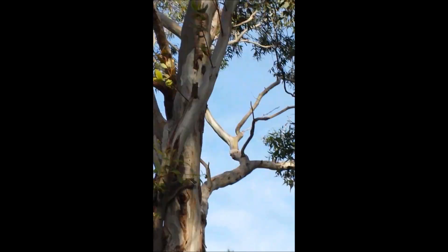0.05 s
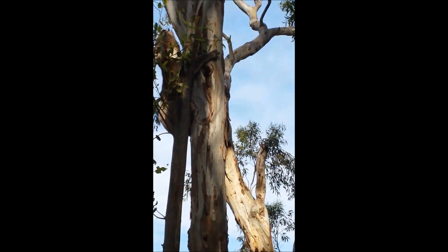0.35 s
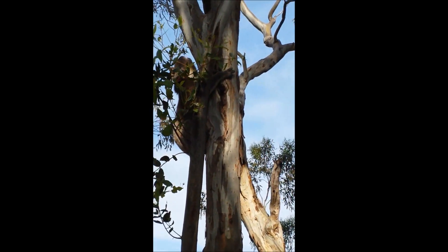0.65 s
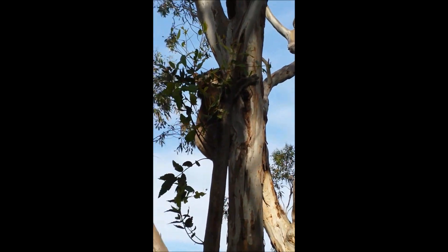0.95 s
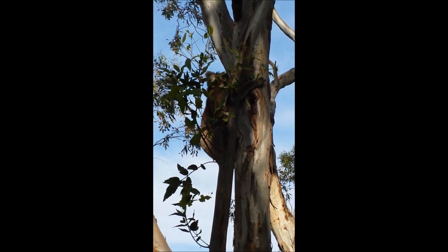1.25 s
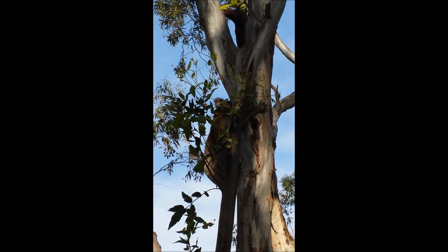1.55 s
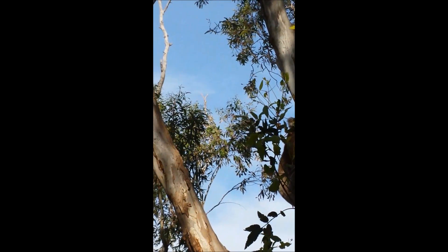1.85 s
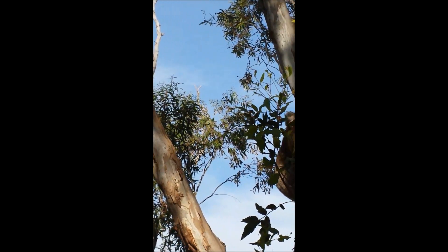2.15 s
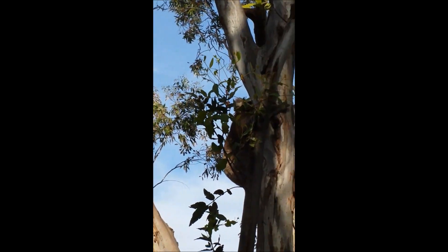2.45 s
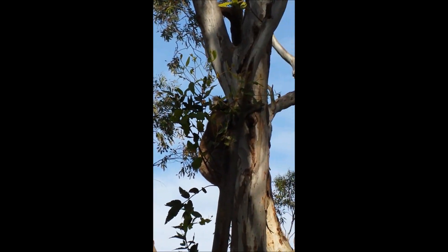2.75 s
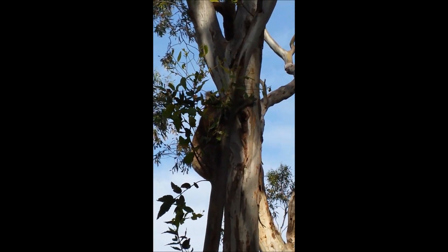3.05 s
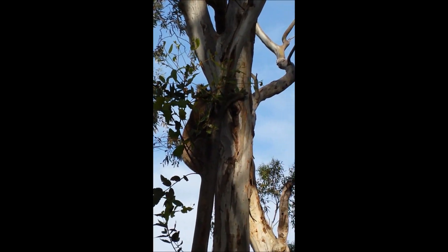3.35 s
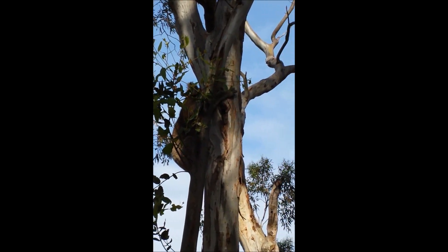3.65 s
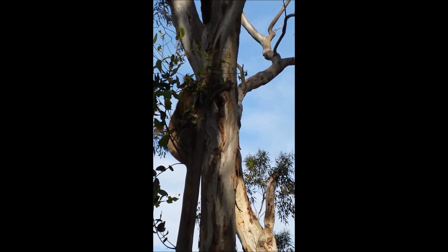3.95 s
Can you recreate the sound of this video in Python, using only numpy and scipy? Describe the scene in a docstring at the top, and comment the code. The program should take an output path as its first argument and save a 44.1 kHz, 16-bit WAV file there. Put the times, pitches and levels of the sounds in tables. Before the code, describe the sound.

A koala bellows outdoors: a rattling grunt, two soft low drones, the first hoarse, then slow pulses dying away. A twig cracks close on the right, and a far bird whistles faintly while air rumbles on the microphone.

```python
"""Koala bellowing in a gum tree

A rattling grunt, two soft low drones, then slow pulses that die away: vocal folds ringing a throat.
A hoarse rasp rides on the first drone; a twig-like crack and small ticks sound close on the right.
Behind them a far bird whistles, air rumbles and bumps at the microphone, and a hiss swells and sinks."""
import sys
import numpy as np
from scipy import signal
from scipy.fft import rfft, irfft
from scipy.io import wavfile
from scipy.ndimage import uniform_filter1d

SR = 44100
rng = np.random.default_rng(int(sys.argv[2]) if len(sys.argv) > 2 else 0)


def master_out(mix):
    """Clip the mix to full scale and print it as 16-bit PCM to the path in sys.argv[1]."""
    frames = np.transpose(np.atleast_2d(mix))
    ceiling = np.clip(frames, -1, 1)
    pcm = np.round(ceiling * 32767).astype(np.int16)
    wavfile.write(sys.argv[1], SR, pcm)


N = 176400
T = np.arange(N) / SR
HZ = np.fft.rfftfreq(N, 1 / SR)

# How each layer swells and fades: time_s, level_db
HISS_FADER = [(0, -64), (0.22, -64.5), (0.29, -69.5), (0.42, -70), (0.58, -65), (0.8, -65), (0.87, -69),
              (1.22, -69), (1.4, -66), (1.7, -64), (1.95, -69.5), (2.62, -67), (2.95, -72.5), (3.45, -74),
              (3.65, -69.5), (3.85, -72), (4, -73)]
RUMBLE_FADER = [(0, -56), (1.3, -54.5), (2.0, -53.5), (2.7, -55), (3.05, -60.5), (4, -61)]
BUFFET_FADER = [(3.46, -69), (3.52, -49), (3.61, -48.5), (3.75, -50), (3.80, -63)]
RUSTLE_FADER = [(2.52, -80), (2.545, -49.5), (2.57, -50.5), (2.59, -56), (2.72, -69)]
RASP_FADER = [(0.49, -64.5), (0.525, -51.5), (0.57, -57), (0.605, -49), (0.73, -53), (0.80, -59),
              (0.825, -74)]
FIRST_DRONE_FADER = [(0.35, -66), (0.39, -49), (0.46, -41), (0.485, -45.5), (0.77, -42), (0.85, -66.5)]
SECOND_DRONE_FADER = [(1.0, -58.5), (1.15, -48), (1.25, -50), (1.40, -46), (1.45, -40.5), (1.49, -46),
                      (1.52, -44), (1.645, -38.5), (1.675, -46), (1.725, -42.5)]
# EQ curves that colour the noise layers: frequency_hz, relative_gain_db
HISS_EQ = [(450, 7), (2000, 1.63), (8000, 0), (14500, -2)]
RUMBLE_EQ = [(12, -23), (30, -13), (55, 1.5), (90, -0.5), (150, -6), (250, -18.5), (500, -31.5),
             (15000, -62)]
BUFFET_EQ = [(25, -14), (100, 6), (170, -7.5), (350, -26), (15000, -62)]
CRACK_EQ = [(200, -3), (900, 1), (1500, -8), (2900, -2.5), (3700, 2.5), (4500, -2.5), (5400, -1),
            (6500, -6.5), (10000, -8.5), (12000, -23)]
TICK_EQ = [(2000, -24), (4500, 10.5), (7500, 9), (11000, -16)]
# Stereo placement across the spectrum: frequency_hz, left_minus_right_db
HISS_PAN = [(3000, -4), (14000, -1.5)]
GRUNT_PAN = [(100, -1), (200, 2), (400, -3), (700, -5), (1300, -9.5), (4000, -8)]
BELLOW_PAN = [(100, -6), (200, -5.5), (400, -13), (700, -15), (1300, -24), (4000, -27)]
# Bumps of air at the microphone: start_s, pitch_hz, gain_db, left_minus_right_db
AIR_BUMPS = [(1.308, 102, -33, 12), (3.676, 109, -18.5, -32)]
# Bird whistles: start_s, length_s, start_pitch_hz, end_pitch_hz, level_db
BIRD_NOTES = [(2.90, 0.12, 2950, 2900, -71), (3.128, 0.075, 2760, 2780, -72),
              (3.162, 0.15, 3020, 2930, -66.5), (3.286, 0.13, 2955, 2940, -70.5),
              (3.428, 0.28, 2960, 2890, -63.5)]
# Thin ticks: start_s
TICK_STARTS = [.036, .356, .677, 1.318, 1.337, 1.639, 1.958, 2.279, 2.918, 2.990, 3.238, 3.558]
# Snaps that make up the crack: start_s, level_db, t60_s
CRACK_SNAPS = [(2.5432, -39, 0.0065), (2.552, -35.5, 0.0052), (2.5641, -29, 0.012), (2.608, -41, 0.011)]
# Resonances of the rasp: centre_hz, width_hz, relative_gain_db
RASP_RESONANCES = [(256, 28, 2), (1080, 1230, -16.5), (1575, 96, 5), (2437, 340, -12.5), (3010, 130, -16),
                   (3403, 150, -7.5), (5040, 270, -17.5), (5540, 180, -16)]
# Sharp catches in the rasp: start_s, added_gain_db
RASP_ACCENTS = [(0.580, 9.5), (0.645, 8.5), (0.683, 5), (0.712, 7.5)]
# Throat resonances for each part of the call: pitch_hz, gain_db, t60_s
DRONE_THROAT = [(183.7, 9, 0.049), (310, -23, 0.2), (647, -32, 0.045), (1120, -21.5, 0.02),
                (1846, -31, 0.1)]
PULSE_THROAT = [(187.6, 1.5, 0.093), (329.7, -9.5, 0.092), (628, -13.5, 0.046), (1096, -20, 0.032),
                (1440, -30, 0.032), (1720, -22.5, 0.022), (3280, -34.5, 0.017)]
GRUNT_THROAT = [(150.4, -0.5, 0.041), (192.5, 3.5, 0.059), (327, -9.5, 0.046), (572, -11, 0.073),
                (1105, -17, 0.025), (1283, -22.5, 0.04), (1700, -21.5, 0.032)]
# Slow throat pulses: start_s, gain_db, tilt_db_per_octave
PULSE_CUES = [(1.750, -31.5, 3), (1.835, -30, 1.5), (1.910, -30.5, 0), (1.989, -33, -0.8),
              (2.062, -32, -1.5), (2.135, -31.5, -2.2), (2.208, -30.5, -3.5), (2.285, -32, -2.5),
              (2.350, -32, -5.5), (2.423, -31, -5), (2.496, -31.5, 0.5), (2.563, -32.5, -2),
              (2.599, -33, -13), (2.631, -34, -1.5), (2.702, -37, -3), (2.74, -38.5, -6)]


def amp(db):
    """Decibels to gain."""
    return 10 ** (np.asarray(db) / 20)


def unit(x):
    """Scales to rms 1."""
    return x / np.sqrt(np.mean(abs(x) ** 2) + 1e-20)


def decay(t, t60_s):
    """A fade that falls 60 dB in t60_s."""
    return np.exp(-np.log(1000) * t / t60_s)


def drift(samples):
    """Slow random wobble: noise smoothed over this many samples."""
    return unit(uniform_filter1d(rng.standard_normal(N), size=samples))


def fader(points):
    """Gain over time, closing to silence just outside the first and last points."""
    time_s, db = np.transpose(points)
    inside_s = np.minimum(T - time_s[0], time_s[-1] - T)
    return amp(np.interp(T, time_s, db)) * np.clip(inside_s * 100 + 2, 0, 1)


def spectrum(points):
    """Gain over frequency, drawn on a log axis."""
    hz, db = np.transpose(points)
    return amp(np.interp(np.log(HZ + 1), np.log(hz), db))


def eq(x, curve):
    """Colours a sound, keeping the power of white noise."""
    return irfft(rfft(x) * unit(spectrum(curve)), N)


def pan(x, curve):
    """Shares a sound between left and right, frequency by frequency."""
    ratio = spectrum(curve)
    return irfft(rfft(x) * np.array([ratio, np.ones_like(ratio)]) * 2 / (1 + ratio), N)


def on_right(x, left_db):
    """Places a sound on the right by turning the left down."""
    return x * amp([[left_db], [0]])


def add(mix, start_s, sound):
    """Mixes a sound in at its cue."""
    at = round(start_s * SR)
    sound = sound[max(-at, 0):]
    part = mix[max(at, 0):][:len(sound)]
    part += sound[:len(part)]


def burst(db, t60_s):
    """A short dying puff of noise."""
    t = np.arange(SR // 20) / SR
    return amp(db) * rng.standard_normal(len(t)) * decay(t, t60_s)


def hiss(trim_db=7.5):
    """A wide, faint bed of hiss that swells and sinks."""
    bed = eq(rng.standard_normal((2, N)), HISS_EQ)
    return pan(bed, HISS_PAN) * fader(HISS_FADER) * amp(trim_db)


def air(rumble_db=2, correlation=0.45, bump_rise_s=0.0031):
    """Air on the microphone: a wide rumble, a bump on each side, and buffeting on the right."""
    left, independent, gust = rng.standard_normal((3, N))
    right = amp(-1) * (correlation * left + np.sqrt(1 - correlation ** 2) * independent)
    rumble = eq(np.array([left, right]), RUMBLE_EQ) * fader(RUMBLE_FADER) * amp(rumble_db)
    buffet = on_right(eq(gust, BUFFET_EQ) * fader(BUFFET_FADER), left_db=-20)
    t = np.arange(SR // 10) / SR
    for start_s, hz, db, left_db in AIR_BUMPS:
        envelope = t / bump_rise_s * np.exp(-t / bump_rise_s)
        bump = amp(db) * envelope * np.sin(2 * np.pi * hz * t)
        add(buffet[0], start_s, amp(left_db) * bump)
        add(buffet[1], start_s, bump)
    return rumble + buffet


def bird(waver=0.0035):
    """Thin, far, wavering whistles, most of them sliding down a little."""
    out = np.zeros(N)
    for start_s, length_s, start_hz, end_hz, db in BIRD_NOTES:
        progress = np.linspace(0, 1, int(length_s * SR))
        glide_hz = start_hz + (end_hz - start_hz) * progress
        hz = glide_hz * (1 + waver * drift(200)[:len(progress)])
        tone = np.sin(2 * np.pi * np.cumsum(hz) / SR)
        add(out, start_s, amp(db) * np.sin(np.pi * progress) * tone)
    return on_right(out, left_db=-15)


def ticks(first_db=-41, fade_db_per_s=1.5):
    """Scattered pinpricks of bright noise that grow fainter."""
    out = np.zeros(N)
    for start_s in TICK_STARTS:
        add(out, start_s, burst(first_db - fade_db_per_s * start_s, t60_s=0.003))
    return on_right(eq(out, TICK_EQ), left_db=-19)


def crack():
    """A dry, twig-like crack: quick snaps of noise over a rustle."""
    out = fader(RUSTLE_FADER) * rng.standard_normal(N)
    for start_s, db, t60_s in CRACK_SNAPS:
        add(out, start_s, burst(db, t60_s))
    return on_right(eq(out, CRACK_EQ), left_db=-19)


def rasp(trim_db=5, grains_per_s=300, grit=0.76, catch_decay_s=0.0045):
    """Irregular grains and air pushed through resonances, with a few hard catches."""
    grains = (rng.random(N) < grains_per_s / SR) * rng.uniform(0.5, 1, N)
    breath = unit(grit * unit(grains) + rng.standard_normal((2, N)))
    resonances = sum((-1) ** k * amp(db) / (1 + 1j * (HZ - hz) / width_hz) ** 2
                     for k, (hz, width_hz, db) in enumerate(RASP_RESONANCES))
    catches = 1 + sum(amp(db) * (T > start_s) * np.exp(-abs(T - start_s) / catch_decay_s)
                      for start_s, db in RASP_ACCENTS)
    voice = irfft(rfft(breath * fader(RASP_FADER) * catches) * unit(resonances), N)
    return on_right(voice * amp(trim_db), left_db=-18.5)


def throat_ring(modes, tilt_db_per_octave=0, rise_cycles=1.16, detune=0.027):
    """One flap of the vocal folds rings the throat, each resonance a little off pitch."""
    t = np.arange(SR // 6) / SR
    out = np.zeros(len(t))
    for hz, db, t60_s in modes:
        gain = amp(db + tilt_db_per_octave * np.log2(hz / modes[0][0]))
        attack = 1 - np.exp(-t * hz / rise_cycles)
        detuned_hz = hz * (1 + detune * rng.standard_normal())
        out += gain * attack * decay(t, t60_s) * np.sin(2 * np.pi * detuned_hz * t)
    return out


def from_tree(voice, pan_curve, echo_db, echo_s=0.0235, left_lag_s=0.00031, tail_db=-10):
    """The voice reaches the right side first, with one echo and a short scatter from the trees."""
    t = np.arange(SR // 3) / SR
    tail = rng.standard_normal((2, len(t))) * decay(t, t60_s=0.12) * (t > 0.012)  # 12 ms pre-delay
    tail = amp(tail_db) * tail / np.linalg.norm(tail[0])
    voice = voice + amp(echo_db) * np.interp(T - echo_s, T, voice, left=0)
    pair = np.array([np.interp(T - left_lag_s, T, voice), voice])
    scatter = signal.fftconvolve(pair, tail, axes=1)[:, :N]
    return pan(pair + scatter, pan_curve)


def koala_drones(trim_db=-1, flutter_hz=31, jitter=0.0799, harmonic=6, tone_gain=0.67):
    """Uneven flutter and air in the throat; one harmonic sings out on the lowest resonance."""
    cycles = np.cumsum(flutter_hz * (1 + jitter * drift(700))) / SR
    flaps = unit(np.diff(np.floor(cycles), prepend=0))
    breath = rng.standard_normal(N)
    voice = unit(signal.fftconvolve(flaps + breath, throat_ring(DRONE_THROAT))[:N])
    voice += tone_gain * unit(np.sin(2 * np.pi * harmonic * cycles))
    voice /= np.sqrt(uniform_filter1d(voice ** 2, size=1200) + 1e-9)  # even out the level
    swells = fader(FIRST_DRONE_FADER) + fader(SECOND_DRONE_FADER)
    return from_tree(voice * swells * amp(trim_db), BELLOW_PAN, echo_db=-23)


def koala_pulses():
    """Flaps slow enough to land as separate throat knocks, varying in brightness and dying away."""
    out = np.zeros(N)
    for start_s, db, tilt in PULSE_CUES:
        add(out, start_s, amp(db) * throat_ring(PULSE_THROAT, tilt))
    return from_tree(out, BELLOW_PAN, echo_db=-13)


def koala_grunt(count=10, gap_s=0.0251, slowing_s=0.0117, gain_db=-27.5, swell_db=0.5, last_drop_db=8):
    """A slowing rattle of hard flaps; the last full one snaps brighter, then a weak one ends it."""
    out = np.zeros(N)
    start_s = -0.0068  # already under way as the scene opens
    last_full = count - 2
    for k in range(count):
        flap = throat_ring(GRUNT_THROAT, tilt_db_per_octave=1 if k == last_full else 0, rise_cycles=0.55)
        db = gain_db + swell_db * k / count - last_drop_db * (k > last_full)
        add(out, start_s, -amp(db) * flap)
        start_s += gap_s + slowing_s * (k / last_full) ** 3
    return from_tree(out, GRUNT_PAN, echo_db=-20)


def scene():
    """The koala up front, close crackle on the right, and bird, air and hiss behind."""
    koala = koala_grunt() + koala_drones() + koala_pulses() + rasp()
    return koala + crack() + ticks() + bird() + air() + hiss()


def record(dry):
    """A steep high cut at 14650 Hz across the mix."""
    high_cut = signal.firwin(511, 14650, window=("kaiser", 9), fs=SR)
    return signal.oaconvolve(dry, high_cut[None], "same")


dry = scene()
out = record(dry)
master_out(out)
```